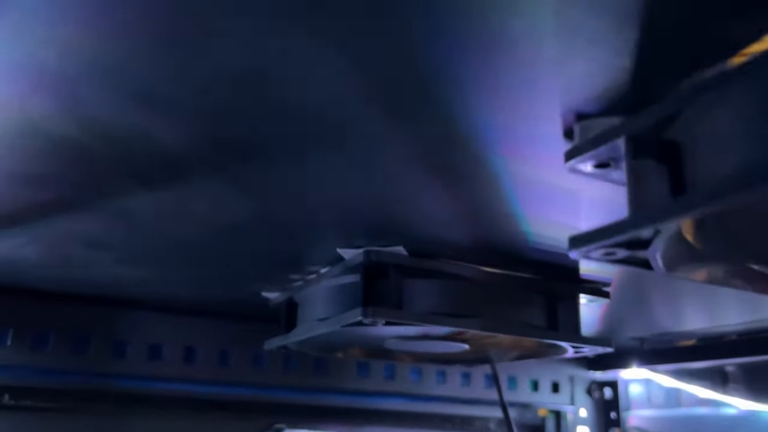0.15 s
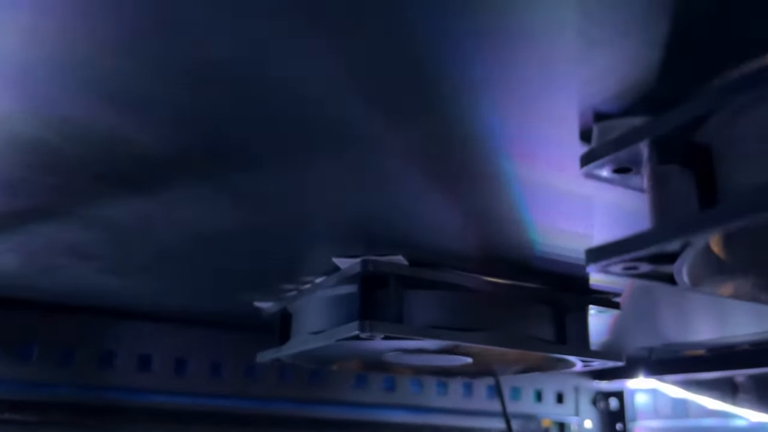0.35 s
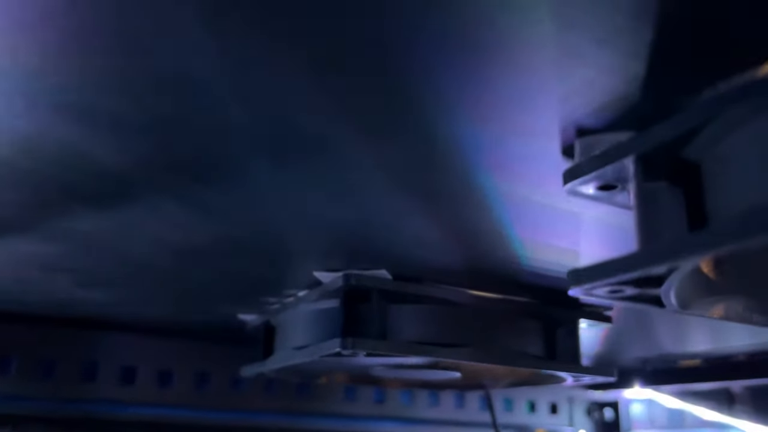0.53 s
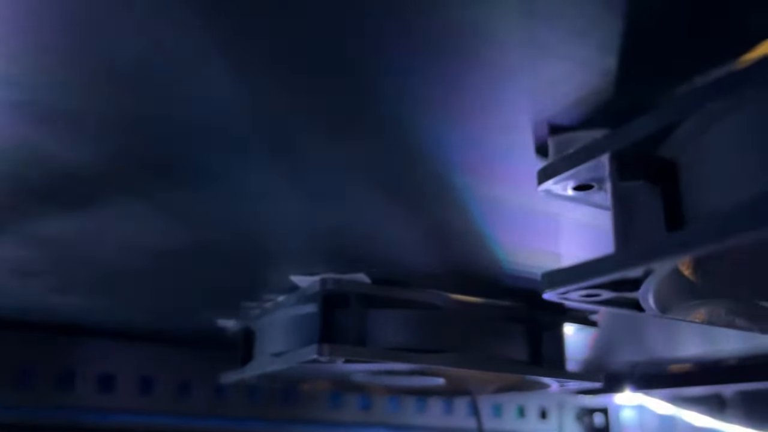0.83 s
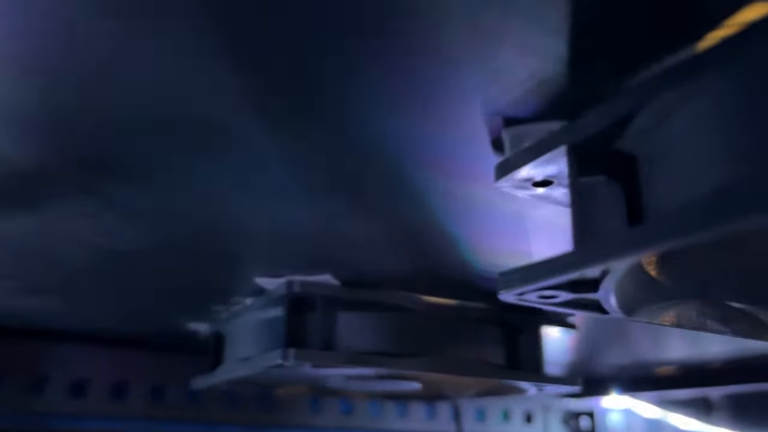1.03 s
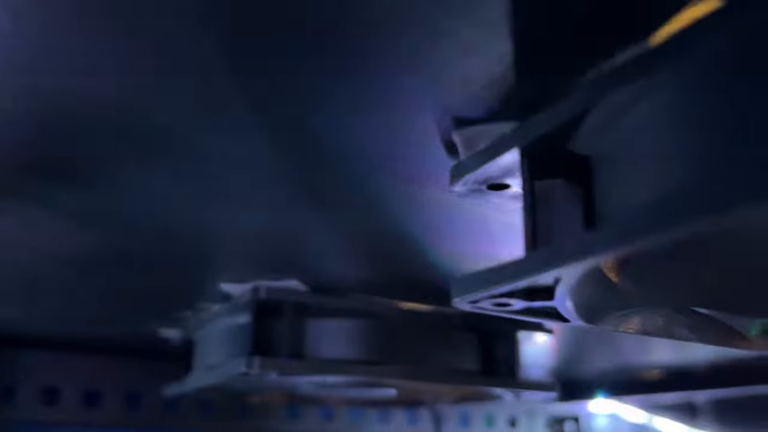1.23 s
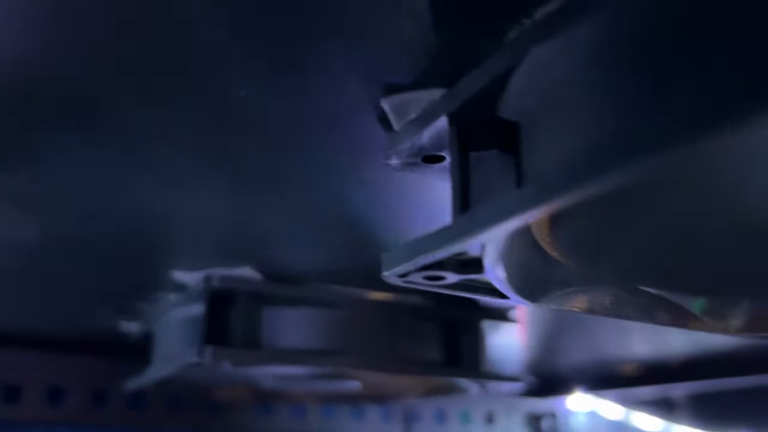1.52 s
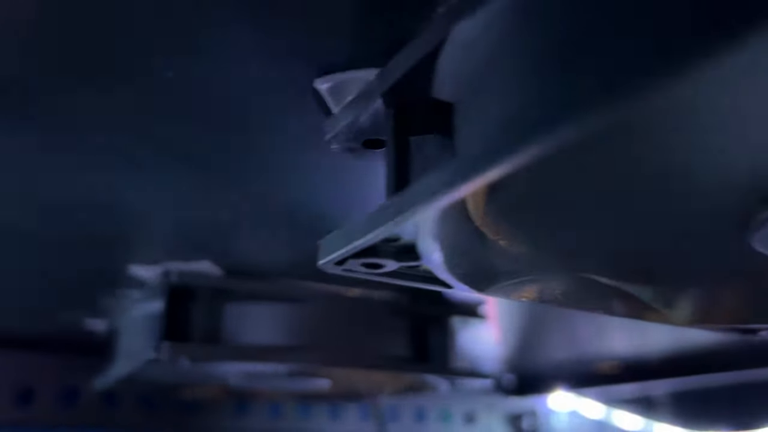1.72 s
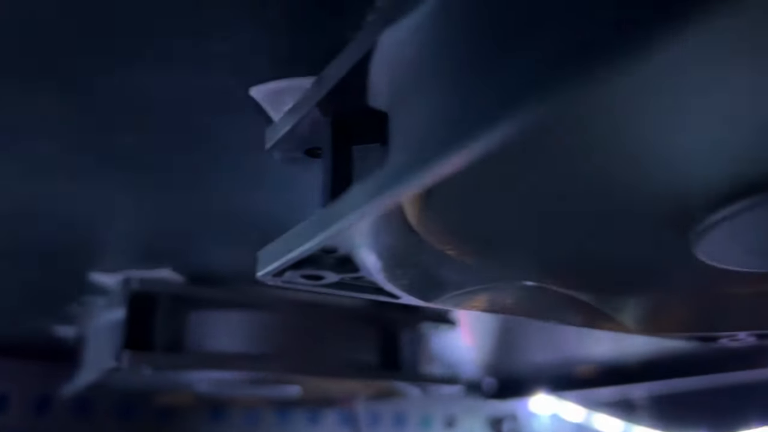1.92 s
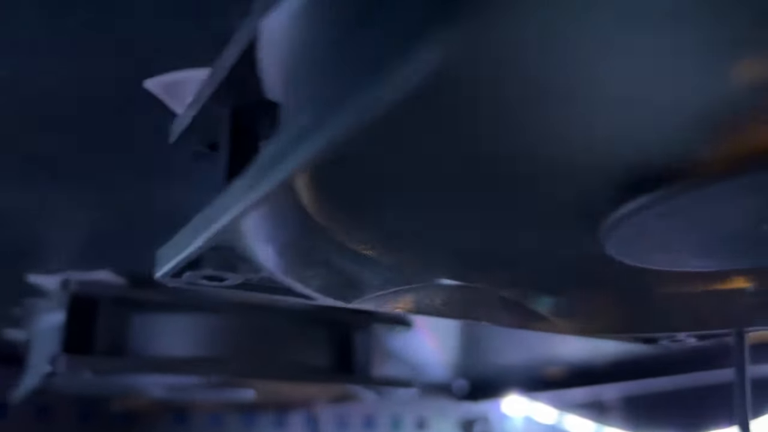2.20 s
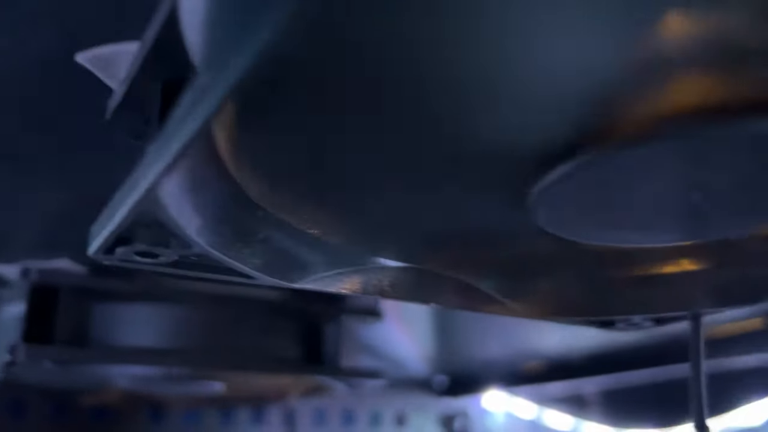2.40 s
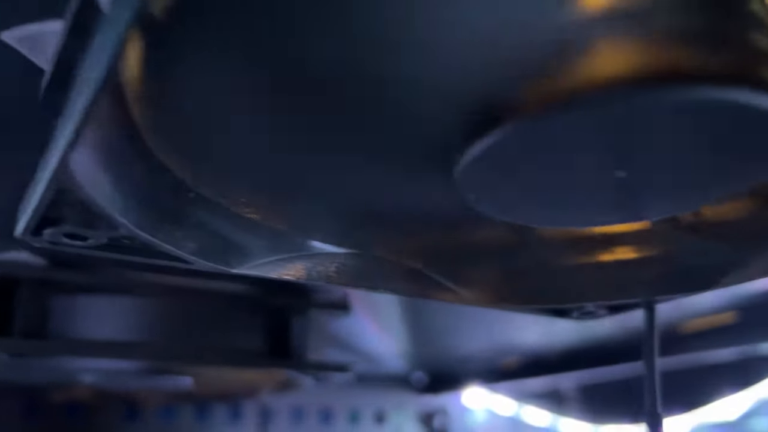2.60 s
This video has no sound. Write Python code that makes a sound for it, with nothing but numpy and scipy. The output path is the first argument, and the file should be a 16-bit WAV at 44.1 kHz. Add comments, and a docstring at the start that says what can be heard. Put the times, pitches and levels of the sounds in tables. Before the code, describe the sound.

Small electric cooling fans run slowly with a low, steady drone of moving air.

```python
"""Small electric cooling fans run slowly on a metal shelf in a quiet room, on a handheld stereo microphone.
From the start, moving air makes a low rumble with the blade tone in it; above lie a thin hiss, breathy
whistles from the housings, faint steady motor whines and now and then a rustle on the left.
The microphone drifts closer and the rumble swells; one whistle flares at 1.7 s, a higher one at 2.3 s.
In the last moments the rumble falls back."""
import sys
import numpy as np
from scipy import signal
from scipy.fft import rfft, irfft, next_fast_len
from scipy.io import wavfile

SR = 44100
rng = np.random.default_rng(int(sys.argv[2]) if len(sys.argv) > 2 else 0)


def wav_out(sig):
    """Save sig, one row per channel (or a flat mono array), as 16-bit PCM at SR to the path in sys.argv[1]."""
    wavfile.write(sys.argv[1], SR, np.round(np.clip(np.atleast_2d(sig).T, -1, 1) * 32767).astype(np.int16))


N = 121275


# The microphone's nearness to the shelf, heard in the rumble.
# Each row: time in seconds, level in dB, left minus right in dB.
MIC_NEARNESS = [(0, -37, -4), (.35, -37.5, 0), (.7, -37, -2), (1.05, -36.5, -1.5), (1.4, -35, -2),
                (1.7, -35.5, 0.5), (1.95, -34.5, -1), (2.07, -35, -1), (2.17, -33, 1), (2.28, -35.5, -0.5),
                (2.42, -33, 0), (2.58, -34, -1), (2.75, -37, -1.5)]
# Colour of the moving air. Each row: frequency in Hz, relative spectral density in dB.
RUMBLE_SPECTRUM = [(18, -37.5), (30, -21), (42, -14.5), (58, 0), (80, -2), (103, 2), (130, -4.5), (170, -3),
                   (240, -10.5), (270, -15.5), (300, -15), (340, -15), (420, -17.5), (455, -21.5),
                   (495, -21.5), (540, -24.5), (700, -29), (1000, -36), (1600, -45.5), (2200, -67.5)]

def rumble():
    """Air pushed by the blades; it swells and sways between the sides as the microphone nears."""
    level_db, left_db = in_time(MIC_NEARNESS)
    return from_db(level_db) * pan(left_db) * moving_air(RUMBLE_SPECTRUM, flicker_db=1.17)


# Width of the air at the microphone. Each row: frequency in Hz, side minus mid in dB.
AIR_WIDTH = [(60, -18), (110, -5), (200, -9.5), (380, -7.5), (700, -1.5), (1290, 0), (2380, -1.5),
             (4400, -0.5), (8120, -0.5), (15000, 0.5)]
# Its balance. Each row: frequency in Hz, left minus right in dB.
AIR_BALANCE = [(60, 1.2), (170, 2.5), (270, 4.5), (450, 5.5), (700, 1), (1100, 2.2), (1700, -1.5),
               (2600, 1), (4000, 2.5), (5800, 7.5), (6800, 8), (8300, -0.5)]
# Its phase between the two channels. Each row: frequency in Hz, left lead in radians.
AIR_LEFT_LEAD = [(40, 0.75), (110, 0.073), (220, 0.2), (340, 0.69), (550, -0.6), (1800, -0.046), (2300, -1),
                 (2900, 0.31), (4000, 0.61), (8000, .9)]

def moving_air(spectrum, flicker_db):
    """Stereo noise of a given colour, mid at unit rms; overlapping half-octave bands flicker apart."""
    size, hz = fft_grid()
    low_hz, high_hz = spectrum[0][0], spectrum[-1][0]
    mid, side = rfft(rng.standard_normal((2, size)))
    side = side * from_db(at_hz(AIR_WIDTH, hz))
    left = (mid + side) * np.exp(1j * at_hz(AIR_LEFT_LEAD, hz))
    colour = from_db(at_hz(spectrum, hz)) * ((hz > low_hz) & (hz < high_hz))
    stereo = np.array([left, mid - side]) * pan(at_hz(AIR_BALANCE, hz)) * colour
    out, half_octaves = 0, 2 * np.log2(hz)
    for centre in range(int(2 * np.log2(low_hz)), int(2 * np.log2(high_hz)) + 2):
        window = np.clip(1 - np.abs(half_octaves - centre), 0, 1)
        band = irfft(stereo * window, size)[:, :N]
        out = out + band * from_db(flicker_db * drift(3.47))
    return out / np.sqrt(np.mean(out.mean(axis=0) ** 2))


# The blades' hum, near the centre. Each row: time in seconds, pitch in Hz, level in dB.
BLADE_PASSING = [(0, 121.1, -44.5), (.25, 120.6, -42), (.45, 121.1, -46), (.7, 121.3, -38.5),
                 (.88, 121.3, -39.5), (1.02, 121.2, -47.5), (1.25, 121.8, -40), (1.57, 121.6, -46.5),
                 (1.9, 121.1, -38.5), (2.05, 121.4, -38), (2.22, 121.4, -44.5), (2.42, 121, -40.5),
                 (2.75, 120.8, -41.5)]

def blade_tone(waver_db=2.0, left_lead_rad=0.14):
    """The blade-passing note, a sine that wavers in strength."""
    hz, level_db = in_time(BLADE_PASSING)
    phase = 2 * np.pi * (np.cumsum(hz) / SR + rng.random())
    tone = np.sqrt(2) * np.sin(phase + np.array([[left_lead_rad], [0]]))
    return pan(left_db=0.5) * from_db(level_db + waver_db * drift(3.6)) * tone


# The hiss at the microphone. Each row: time in seconds, level in dB.
HISS_LOUDNESS = [(0, -69.5), (.14, -69), (.35, -69), (.6, -69.5), (1.3, -71), (2.0, -71), (2.75, -71.5)]
# Its colour. Each row: frequency in Hz, relative spectral density in dB.
HISS_SPECTRUM = [(900, -6), (1400, -6), (1800, -2), (2100, -1), (2420, -4.5), (2520, -5), (2800, -4.5),
                 (2950, -10.5), (3400, -12.5), (3800, -16.5), (5500, -18.5), (6500, -17), (7300, -9),
                 (7900, -9.5), (8400, -16.5), (9400, -21), (10500, -48)]

def hiss():
    """Thin turbulence at blade tips and grilles."""
    level_db, = in_time(HISS_LOUDNESS)
    return from_db(level_db) * moving_air(HISS_SPECTRUM, flicker_db=1.8)


# Weak whistles from the housings. Each row: pitch in Hz, width in Hz, gain in dB,
# left minus right in dB, waver in dB.
WEAK_WHISTLES = [(1370, 110, -82, 0, 2.5), (1960, 110, -82.5, 0, 2), (2245, 45, -88, 0, 2.5),
                 (2560, 130, -82.5, 2.5, 2.5), (2790, 60, -85, 2.5, 2.5), (6756, 30, -95, 7, 2.5),
                 (7147, 25, -94, 1, 2.5)]
# Three whistles that change with the microphone's place.
# Each row: pitch in Hz, width in Hz, left minus right in dB.
SHIFTING_WHISTLES = [(2700, 45, 1.5), (8092, 70, 0), (5790, 40, 14)]
# Their rise and fall. Each row: time in seconds, then gains of the first, second and third in dB.
SHIFTING_GAINS = [(0, -90, -84, -100), (0.2, -77.5, -80, -102), (.5, -77, -83.5, -103),
                  (.85, -74.5, -82, -104), (1.3, -79.5, -93, -106), (1.6, -81, -85, -106),
                  (1.72, -72, -82, -100), (1.82, -82.5, -87, -105), (1.899, -74, -92, -100),
                  (1.99, -87, -97, -94), (2.08, -80, -94, -104), (2.3, -84, -72.5, -101),
                  (2.55, -92, -98, -108), (2.75, -86, -89, -108)]

def whistles(tone_share=0.5):
    """Air blowing across gaps in the housings: the weak whistles are all breath, the others part tone."""
    out = 0
    for hz, width_hz, gain_db, left_db, waver_db in WEAK_WHISTLES:
        out = out + from_db(gain_db + waver_db * drift(0.94)) * breath(hz, width_hz, left_db)
    for whistle, gain_db in zip(SHIFTING_WHISTLES, in_time(SHIFTING_GAINS)):
        tone = np.sqrt(tone_share) * wobbling_tone(*whistle)
        noise = np.sqrt(1 - tone_share) * breath(*whistle)
        out = out + from_db(gain_db) * (tone + noise)
    return out


def breath(hz, width_hz, left_db):
    """Noise twice through a narrow resonance, partly shared by the two sides."""
    radius = np.exp(-np.pi * width_hz / SR)
    resonance = [1, 0, -1, 1, -2 * radius * np.cos(2 * np.pi * hz / SR), radius * radius]
    mid, side = rms_one(signal.sosfilt([resonance, resonance], rng.standard_normal((2, N))))
    return pan(left_db) * (mid + 0.45 * side * [[1], [-1]])


def wobbling_tone(hz, width_hz, left_db):
    """A tone of even strength whose pitch shivers across the given width."""
    cycles = np.cumsum(hz + width_hz / 2 * drift(25)) / SR + rng.random()
    return pan(left_db) * np.sqrt(2) * np.sin(2 * np.pi * cycles)


# Airy rustles near the left port. Each row: peak time in seconds, spread (sigma) in seconds,
# left peak level in dB, low and high band edges in Hz.
PORT_RUSTLES = [(0.023, 0.052, -75, 4500, 6800), (.145, 0.022, -69.5, 3180, 6800),
                (.34, 0.017, -73.5, 3200, 6850), (0.583, 0.016, -81, 3250, 6800),
                (.77, 0.059, -80.5, 3840, 6200), (1.557, .03, -75.5, 3003, 3620),
                (1.92, 0.046, -77, 2950, 4313), (2.4, .05, -78, 2941, 3600)]

def rustles(right_db=-14):
    """Soft bell-shaped puffs of band noise, mostly on the left."""
    t, out = np.arange(N) / SR, 0
    for peak_s, spread_s, level_db, low_hz, high_hz in PORT_RUSTLES:
        band = signal.butter(2, [low_hz, high_hz], "band", fs=SR, output="sos")
        noise = rms_one(signal.sosfilt(band, rng.standard_normal((2, N))))
        puff = np.exp(-.5 * ((t - peak_s) / spread_s) ** 2)
        out = out + from_db(level_db) * puff * noise
    return out * from_db([[0], [right_db]])


# Colour of the topmost hiss. Each row: frequency in Hz, relative spectral density in dB.
SHEEN_SPECTRUM = [(7600, -18.5), (8600, -7), (9500, -7.5), (11500, 4), (13500, -4.5), (15000, -0.5),
                  (17000, -1)]

def sheen(level_db=-83, unshared_db=-15.5, lag_s=.000294):
    """Faint, wide top hiss; the left channel is mostly a delayed, inverted copy of the right."""
    size, hz = fft_grid()
    shared, *unshared = rfft(rng.standard_normal((3, size)))
    left = -shared * np.exp(-2j * np.pi * hz * lag_s)
    stereo = np.array([left, shared]) + from_db(unshared_db) * np.array(unshared)
    colour = from_db(at_hz(SHEEN_SPECTRUM, hz)) * (hz > SHEEN_SPECTRUM[0][0])
    return from_db(level_db) * rms_one(irfft(stereo * colour, size)[:, :N])


# The motors, barely heard under the air. Each row: pitch in Hz, level in dB,
# left minus right in dB, left lead in cycles.
MOTOR_WHINES = [(3711, -99, 13, .25), (6600, -100, 11, .25), (7553, -91, 6, .1), (8682, -107, -1.5, 0),
                (12000, -106, 0, 0), (12200, -107, 0, 0)]

def whines(waver_db=0.5):
    """Thin motor tones of steady pitch."""
    t, out = np.arange(N) / SR, 0
    for hz, level_db, left_db, lead in MOTOR_WHINES:
        gain = pan(left_db) * from_db(level_db - waver_db * drift(1.0))
        cycles = hz * t + rng.random() + np.array([[lead], [0]])
        out = out + gain * np.sqrt(2) * np.sin(2 * np.pi * cycles)
    return out


def drift(corner_hz):
    """Slow random wander of about unit rms: noise twice through a one-pole low-pass."""
    hop, run_in = 40, 2000
    pole = np.exp(-2 * np.pi * corner_hz * hop / SR)
    noise = rng.standard_normal(N // hop + run_in + 2)
    slow = signal.lfilter([1], [1, -2 * pole, pole * pole], noise)[run_in:]
    return np.interp(np.arange(N) / hop, np.arange(len(slow)), rms_one(slow))


def from_db(db):
    """Decibels to gain."""
    return 10 ** (np.asarray(db) / 20)


def rms_one(x):
    """Scale to unit rms."""
    return x / np.sqrt(np.mean(x ** 2) + 1e-20)


def pan(left_db):
    """Left and right gains for a left-minus-right balance."""
    return from_db(np.array([left_db / 2, -left_db / 2])).reshape(2, -1)


def in_time(rows):
    """Columns of a time table at every sample."""
    seconds, *columns = np.transpose(rows)
    return [np.interp(np.arange(N) / SR, seconds, column) for column in columns]


def at_hz(rows, hz):
    """Read a spectrum table on a log-frequency axis."""
    row_hz, values = np.transpose(rows)
    return np.interp(np.log(hz), np.log(row_hz), values)


def fft_grid():
    """FFT size and its bin frequencies, floored at 1 Hz."""
    size = next_fast_len(N)
    return size, np.maximum(np.arange(size // 2 + 1) * SR / size, 1)


def scene():
    """The fans on their shelf, heard in stereo."""
    return rumble() + blade_tone() + hiss() + sheen() + whistles() + whines() + rustles()


def record(dry, fade_in_s=.012, cutoff_hz=15720):
    """A short fade-in and a steep cut of the top."""
    fade_in = np.minimum(np.arange(N) / (fade_in_s * SR), 1)
    low_pass = signal.ellip(12, .3, 60, cutoff_hz, fs=SR, output="sos")
    return signal.sosfilt(low_pass, dry * fade_in)


dry = scene()
out = record(dry)
wav_out(out)
```